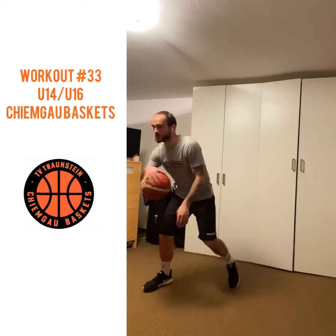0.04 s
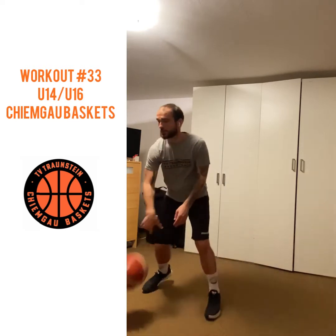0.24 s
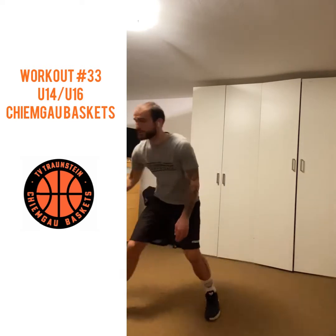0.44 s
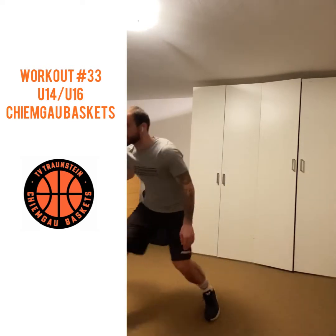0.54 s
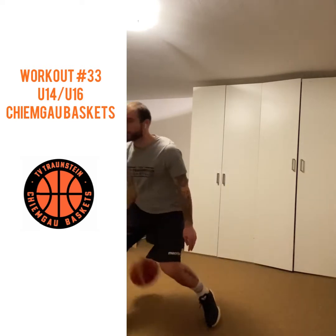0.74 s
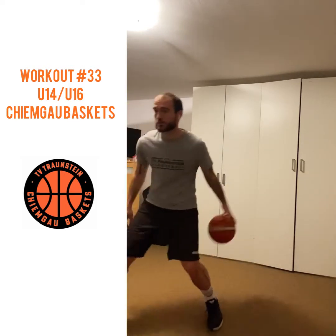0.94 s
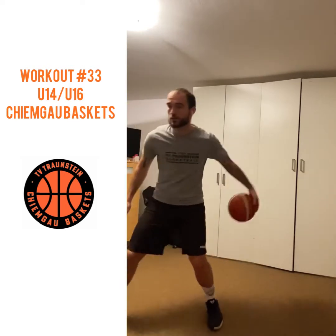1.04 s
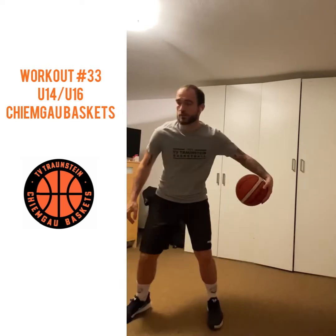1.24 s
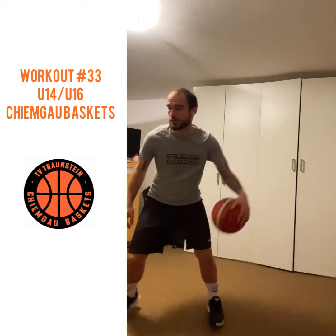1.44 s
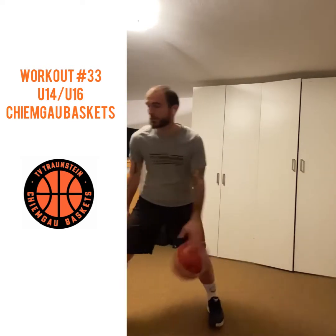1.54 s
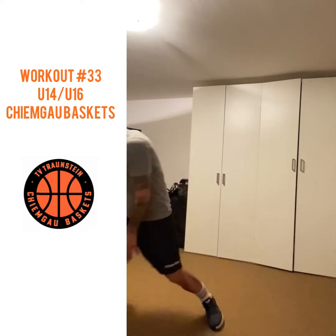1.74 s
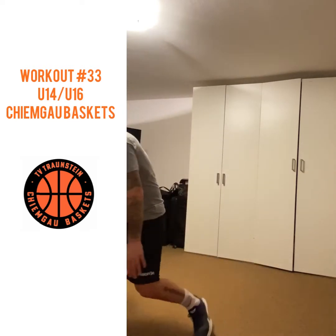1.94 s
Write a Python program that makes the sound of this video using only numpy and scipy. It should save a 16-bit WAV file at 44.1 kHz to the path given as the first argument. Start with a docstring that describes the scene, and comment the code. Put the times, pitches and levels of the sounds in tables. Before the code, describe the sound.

In a small carpeted room, a nearby basketball bounces three times, with a short gap and then a longer one. Each hit thumps with a hollow ping and faint high ring, while shoes scuff and hands brush the ball.

```python
"""Soft footfalls and scuffs come first, then a basketball is dribbled hard three times on carpet.
Each bounce slaps, pings the air in the ball and sets the small room booming; a thin high ring swells
after it. Between bounces, shoes thud and scuff and hands brush and tap the ball.
A faint low hush lies under it all."""
import sys
import numpy as np
from scipy import signal
from scipy.fft import irfft
from scipy.io import wavfile
from scipy.ndimage import uniform_filter1d

SR = 44100
rng = np.random.default_rng(int(sys.argv[2]) if len(sys.argv) > 2 else 0)


def generate_wav(signal):
    """Clip the signal to [-1, 1] and save it as 16-bit WAV at the path in sys.argv[1]."""
    frames = np.transpose(np.atleast_2d(signal))
    scaled = np.clip(frames, -1, 1) * 32767
    pcm = np.round(scaled).astype(np.int16)
    wavfile.write(sys.argv[1], SR, pcm)


N = 88200
T = np.arange(int(.6 * SR)) / SR  # seconds since the start of one sound
CUT_HZ = 11700


def amp(db):
    """Turns decibels into a gain."""
    return 10 ** (np.asarray(db) / 20)


def unit(x):
    """Scales a sound to an average strength (rms) of 1."""
    return x / np.sqrt(np.mean(x ** 2) + 1e-20)


def read(points, hz):
    """Looks up a frequency in a table, sliding between rows on an octave scale."""
    freqs, values = np.transpose(points)
    return np.interp(np.log(hz + 1), np.log(freqs + 1), values)


def pan(db):
    """Two gains that make the left side db louder than the right."""
    return amp(np.array([[db], [-db]]) / 2)


def add(mix, start, sound):
    """Mixes a sound in at a start time in seconds."""
    part = mix[:, round(start * SR):][:, :sound.shape[-1]]
    part += sound[..., :part.shape[1]]


def rise(seconds):
    """A smooth climb from 0 to 1."""
    return 1 - np.exp(-(T / seconds) ** 2)


def dulled(hz, above_hz):
    """A softer contact loses treble: up to 9 dB, over half an octave."""
    return -9 * np.clip(np.log2((hz + 1) / above_hz) * 2, 0, 1)


def noise(colour, size=len(T)):
    """Stereo noise, alike on both sides in the bass; colour is a function from Hz to dB."""
    # Each row: frequency in Hz, how alike left and right are (1 is the same).
    likeness = [(100, 0.86), (300, 1), (550, 0.33), (1100, 0.19), (2200, .3), (4500, -0.035),
                (10000, -0.15)]
    hz = np.fft.rfftfreq(size, 1 / SR)
    mid, side = np.exp(2j * np.pi * rng.random((2, len(hz))))
    alike = np.clip(read(likeness, hz), -1, 1)
    mid, side = mid * np.sqrt(1 + alike), side * np.sqrt(1 - alike)
    return unit(irfft(np.array([mid + side, mid - side]) * amp(colour(hz)), size))


def room_hush():
    """The steady, faint, mostly low noise of the room."""
    # Each row: frequency in Hz, relative level in dB.
    colour = [(25, -5), (62, 4), (110, -7.5), (180, -18.5), (400, -21.5), (650, -25.5), (1100, -20),
              (2200, -31), (4500, -37.5), (10000, -42), (12000, -62)]
    return amp(-63) * noise(lambda hz: read(colour, hz), size=N)


def room_fade(x):
    """Lets a sound die away in the room, each band at its own speed, over a faint slow tail."""
    # Each row: frequency in Hz, seconds to fade by 60 dB.
    fade_times = [(80, 0.9), (250, 0.39), (500, 0.47), (1000, 0.44), (2500, 0.42), (5000, 0.5),
                  (10000, 0.35)]
    hz, t, bands = signal.stft(x, SR, nperseg=512)
    main_tail = amp(-60 * t / read(fade_times, hz)[:, None])
    slow_tail = amp(-27 - 60 * t)
    return signal.istft(bands * np.hypot(main_tail, slow_tail), SR, nperseg=512)[1][:, :len(T)]


def in_room(x, echo_db):
    """Adds the room's echo to a small sound."""
    tail = room_fade(noise(np.zeros_like)) * rise(0.0051)
    echo = signal.fftconvolve(x[:1], tail / np.linalg.norm(tail[0]), axes=1)
    return x + amp(echo_db) * echo[:, :len(T)]


def rub(colour, length, db, rise_s, dull_hz=CUT_HZ, *, release_s, grain_db):
    """Two surfaces rubbing: grainy noise that rises, holds and dies away."""
    grain = amp(grain_db * unit(uniform_filter1d(rng.standard_normal(len(T)), size=90)))
    stroke = rise(rise_s) * np.exp(-np.maximum(T - length, 0) / release_s)
    hiss = noise(lambda hz: read(colour, hz) + dulled(hz, dull_hz))
    return amp(db) * in_room(unit(hiss * grain) * stroke, echo_db=-3.5)


def tap(db, centre_hz, decay_s, octaves, echo_db):
    """A brief blow: a burst of noise around one frequency."""
    burst = noise(lambda hz: -20 * np.log10(1 + (np.log2((hz + 1) / centre_hz) / octaves) ** 4))
    return amp(db) * in_room(burst * rise(.5 / centre_hz) * np.exp(-T / decay_s), echo_db)


def boom(soft_hz):
    """A blow on the floor builds up the room's own notes; a soft blow reaches only the low ones."""
    # Each row: pitch in Hz, level in dB, seconds to fade by 60 dB, build-up in seconds.
    room_notes = [(59.5, 0.5, .38, .06), (69.1, -10, .43, .06), (79.9, -12, .35, .06),
                  (113.3, -9.5, .32, .019), (154.5, -7, .26, .016), (171, -16, .28, .02),
                  (236, -20, .28, .006), (262, -17, .26, .006), (368, -23, .3, .006)]
    sound = np.zeros(len(T))
    for k, (hz, db, fade_s, build_s) in enumerate(room_notes):
        note = amp(db - 60 * T / fade_s) * rise(build_s) * np.sin(2 * np.pi * hz * T)
        sound += (-1) ** k * note / np.hypot(1, (hz / soft_hz) ** 2)
    return sound


def thump():
    """The dull part of a blow on the floor, fading in the room."""
    # Each row: frequency in Hz, relative level in dB.
    colour = [(40, -24.5), (110, -0.5), (170, -7), (250, -0.5), (360, -3.5), (460, -9.5), (700, -37),
              (2000, -64.5)]
    return room_fade(noise(lambda hz: read(colour, hz))) * rise(0.0041) * pan(1.7)


def add_hands(mix):
    """Hands and clothes brush, with small taps and clicks; the loud click at 0.74 s is a shoe sole squeaking."""
    # Each row: frequency in Hz, relative level in dB.
    brush_colour = [(150, -7.5), (400, 1), (1200, 2.5), (2200, -3.5), (3200, -8.5), (5000, -13),
                    (7500, -15), (10000, -18), (12000, -34.5)]
    # Each row: start and length in seconds, level in dB, rise in seconds.
    brushes = [(0.137, 0.035, -51.5, 0.0084), (0.411, .012, -44, .003), (0.421, 0.012, -41.5, 0.0017),
               (0.88, 0.075, -58.5, .006), (1.286, 0.01, -62, 0.0016), (1.351, 0.043, -62.5, 0.013),
               (1.747, 0.024, -48, 0.0089), (1.822, 0.018, -55, 0.0087)]
    # Each row: start in seconds, level in dB, centre in Hz, decay in seconds.
    taps = [(0.386, -57, 7960, 0.012), (0.574, -57.5, 4970, 0.0018), (0.7405, -24, 1346, 0.0008),
            (0.7388, -42.5, 7110, 0.004), (0.884, -58, 7600, 0.053), (1.009, -62, 8100, 0.0064),
            (1.371, -51, 1910, 0.0017), (1.759, -52, 1915, 0.0012), (1.971, -52.5, 1420, 0.0023),
            (1.98, -50, 1500, 0.00089)]
    for start, *brush in brushes:
        add(mix, start, rub(brush_colour, *brush, release_s=0.016, grain_db=3.5))
    for start, *touch in taps:
        add(mix, start, tap(*touch, octaves=.75, echo_db=-11))


def add_shoes(mix):
    """Feet thud on the floor and soles slide on the carpet; one landing gives a hollow knock."""
    # Each row: start in seconds, boom level in dB, thump level in dB.
    steps = [(0.132, -21, -50), (0.152, -31.5, -41), (0.171, -12, -61), (0.449, -17, -35),
             (0.509, -24, -41), (0.6, -31.5, -59), (0.71, -31.5, -52), (1.046, -28.5, -45.5),
             (1.18, -47, -64), (1.559, -35, -47.5), (1.882, -31.5, -80)]
    # Each row: frequency in Hz, relative level in dB.
    scuff_colour = [(50, 2.5), (160, -10.5), (370, -8), (620, -4.5), (880, -2.5), (1020, 1), (1200, -11.5),
                    (1800, -13.5), (3600, -19.5), (6000, -22.5), (10000, -25.5), (12000, -44)]
    # Each row: start and length in seconds, level in dB, rise in seconds, Hz above which it dulls.
    scuffs = [(0.126, .016, -52, 0.0024, 6000), (0.143, 0.019, -43, 0.0028, 2500),
              (0.708, 0.012, -41, 0.016, 2490), (1.009, 0.0049, -51.5, 0.0026, 8860),
              (1.04, 0.093, -47.5, 0.0012, 4200), (1.558, 0.12, -48.5, .002, 7050)]
    # Start in seconds, level in dB, centre in Hz.
    knock = (0.45, -32, 552)
    for start, boom_db, thump_db in steps:
        thud = amp(thump_db) * thump() * np.exp(-T / 0.14)
        add(mix, start, amp(boom_db) * boom(soft_hz=78.4) + thud)
    for start, *scuff in scuffs:
        add(mix, start, rub(scuff_colour, *scuff, release_s=.012, grain_db=1.74))
    add(mix, knock[0], tap(*knock[1:], decay_s=0.025, octaves=0.43, echo_db=-7.5))


def high_ring():
    """Thin high tones and sizzle that swell and die after a bounce."""
    # Each row: pitch in Hz, relative level in dB.
    high_tones = [(4785, -13.5), (4862, -10.5), (4912, -2.5), (4968, -11), (5036, 5), (5217, -3),
                  (5286, -2), (5345, -7), (5470, -1.5)]
    # Each row: frequency in Hz, relative level in dB.
    sizzle_colour = [(3000, -38), (4300, -21.5), (4750, -5.5), (5050, -1), (5500, -8.5), (6300, -25.5),
                     (8500, -29), (9800, -16), (11000, -35.5)]
    peak_s, width_s = 0.091, 0.049
    tones = sum(amp(db) * np.sin(2 * np.pi * (hz * T + rng.random((2, 1)))) for hz, db in high_tones)
    sizzle = noise(lambda hz: read(sizzle_colour, hz))
    swell = np.exp(-((T - peak_s) / width_s) ** 2 / 2) * rise(width_s / 2)
    return (amp(-4) * unit(tones) + amp(-4.5) * sizzle) * swell * pan(-3.5)


def push(length_s, hz):
    """A couple of swings of air pressure as the ball squashes and springs back."""
    squash = np.sin(np.pi * np.minimum(T / length_s, 1))
    return -squash * np.sin(2 * np.pi * hz * T)


def slap(dull_hz):
    """The ball's shell cracks and the air inside pings, followed by a spray of echoes."""
    # Each row: pitch of the shell or air in Hz, level in dB, seconds to fade by 60 dB.
    ball_notes = [(703, 5, 0.005), (1120, 14, 0.012), (1463, 11, 0.012), (2000, 5, .01), (684, -14.5, 0.39),
                  (921, -8, 0.24), (1080, -7.5, .25), (1154, -15.5, 0.22), (1263.6, -13.5, 0.41),
                  (1392, -8.5, 0.16), (1583, -10, 0.15), (1686, -18.5, .27), (1956, -16.5, 0.1),
                  (2320, -19, 0.21)]
    # Each row: frequency in Hz, relative level in dB.
    echo_colour = [(200, -31), (450, 2), (700, -0.5), (1000, 0.5), (1450, -4), (2200, -15), (3200, -19),
                   (4500, -34.5), (7000, -34.5), (10000, -37.5), (12000, -51.5)]
    ping = sum(amp(db + dulled(hz, dull_hz) - 60 * T / fade_s) * np.sin(2 * np.pi * hz * T)
               for hz, db, fade_s in ball_notes)
    echoes = room_fade(noise(lambda hz: read(echo_colour, hz) + dulled(hz, dull_hz)))
    echoes *= amp(-2.5 + 3.5 * np.exp(-T / 0.042))  # the earliest echoes are stronger
    crack = tap(db=-5.5, centre_hz=2800, decay_s=0.001, octaves=1.0, echo_db=-2)
    return (ping + echoes + crack) * rise(0.0012)


def add_dribble(mix):
    """The ball hits the carpet three times, each with a thump, slap, ring, boom and push of air."""
    # Each row: start in seconds, boom level in dB and delay in seconds, push level in dB and delay
    # in seconds, thump and slap levels in dB, Hz above which the slap dulls, ring level in dB,
    # the slap's lean to the left in dB.
    bounces = [(0.2438, 1, .002, -12, 0.0035, -17.5, -23, 2100, -46, 2),
               (0.7331, -1.5, 0.00077, -11, 0.0024, -19, -23.5, 1600, -48, 1),
               (1.5963, -0.5, 0.003395, -13, 0.01016, -21, -26, 1900, -48, 2)]
    for (start, boom_db, boom_delay, push_db, push_delay,
         thump_db, slap_db, dull_hz, ring_db, left_db) in bounces:
        add(mix, start, amp(thump_db) * thump())
        add(mix, start, amp(slap_db) * slap(dull_hz) * pan(left_db))
        add(mix, start, amp(ring_db) * high_ring())
        add(mix, start + boom_delay, amp(boom_db) * boom(soft_hz=900) * pan(.6))
        add(mix, start + push_delay, amp(push_db) * push(length_s=0.014, hz=183) * pan(.6))


def scene():
    """Ball and player over the quiet of the room."""
    mix = room_hush()
    add_dribble(mix)
    add_shoes(mix)
    add_hands(mix)
    return mix


def record(dry):
    """Cuts away the treble above CUT_HZ."""
    low_pass = signal.firwin(255, CUT_HZ, window=("kaiser", 9), fs=SR)
    return signal.oaconvolve(dry, low_pass[None], "same")


dry = scene()
out = record(dry)
generate_wav(out)
```